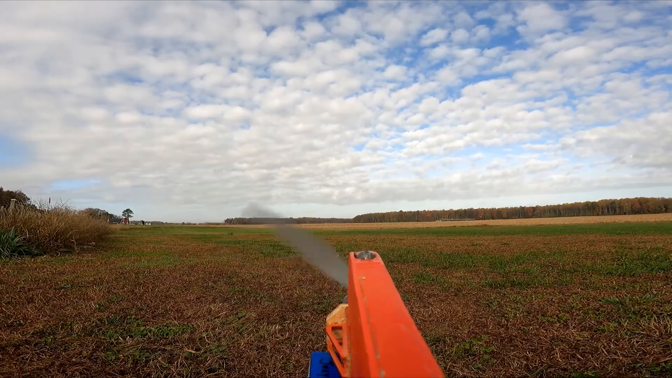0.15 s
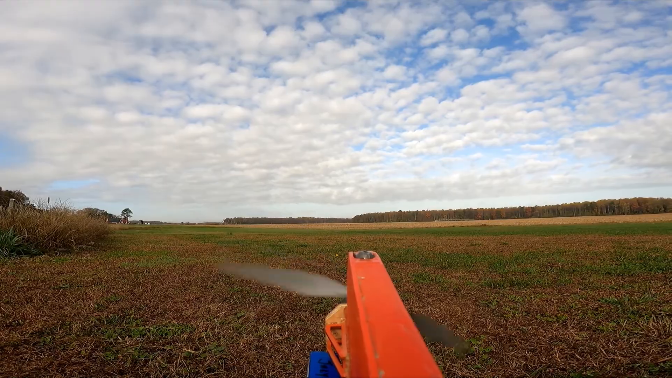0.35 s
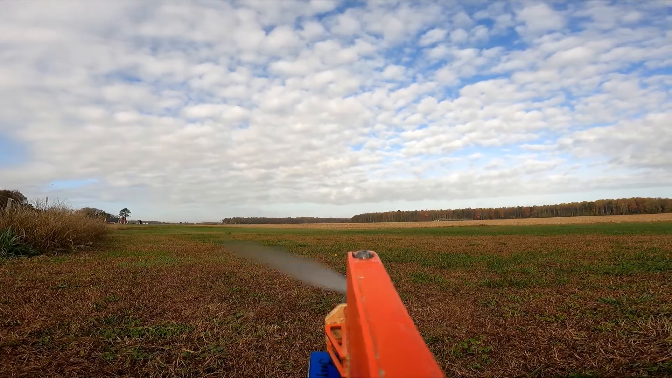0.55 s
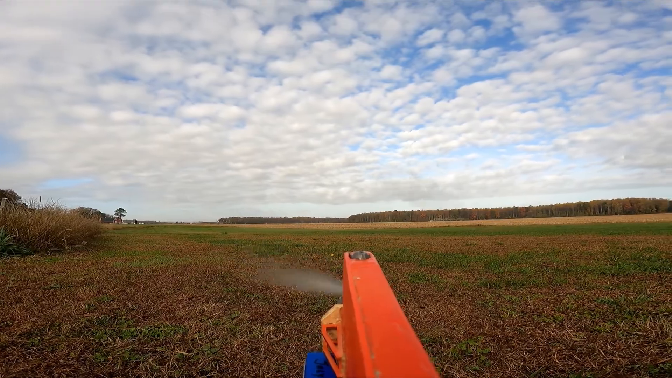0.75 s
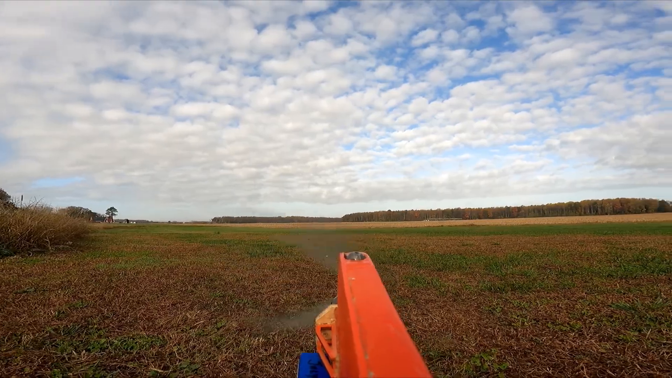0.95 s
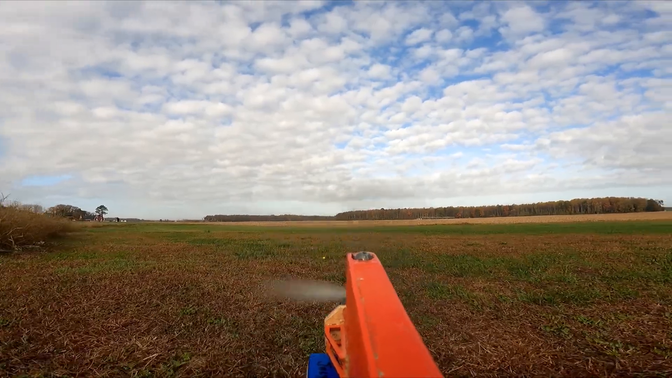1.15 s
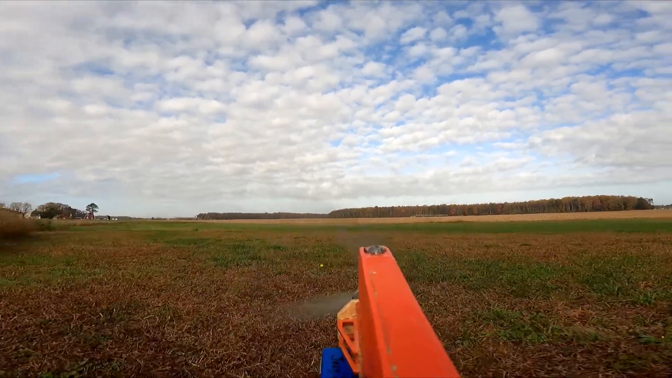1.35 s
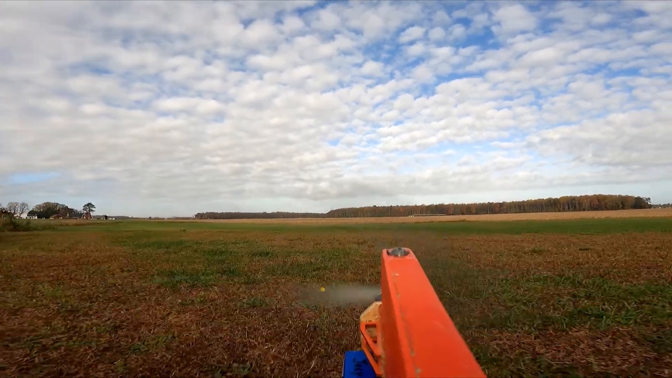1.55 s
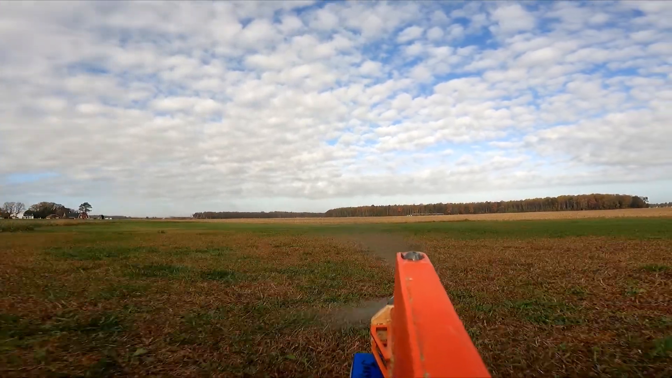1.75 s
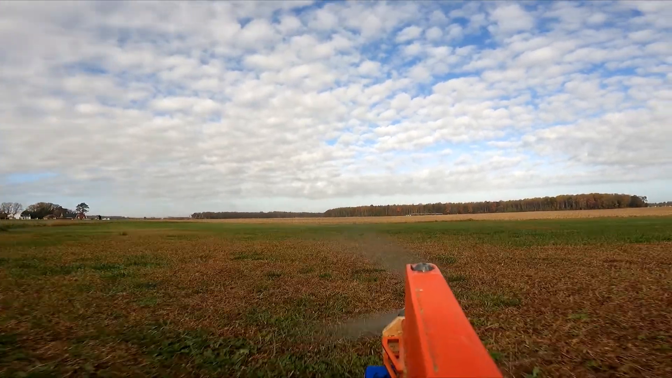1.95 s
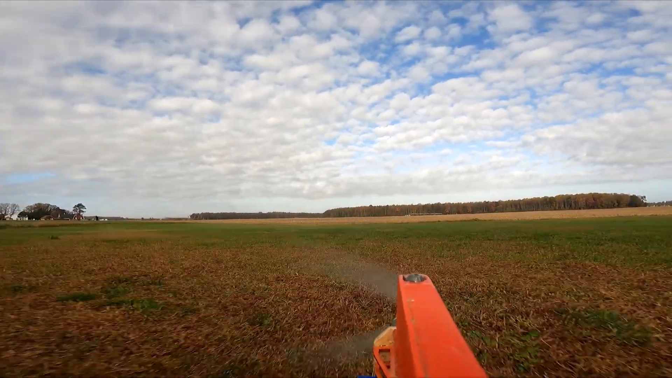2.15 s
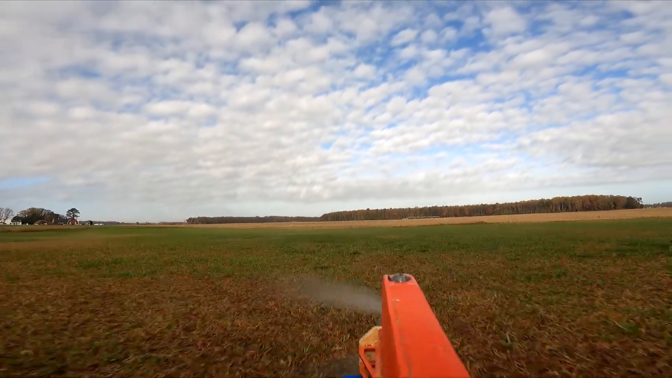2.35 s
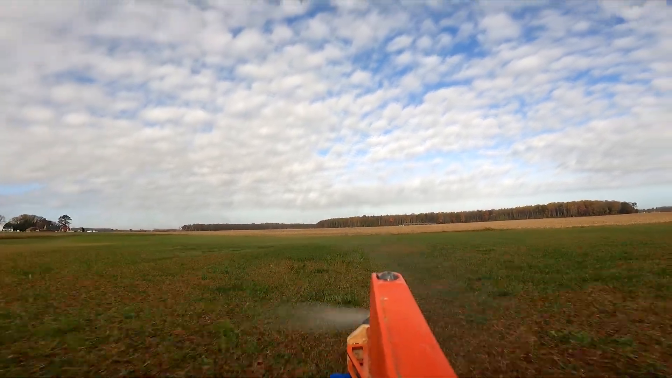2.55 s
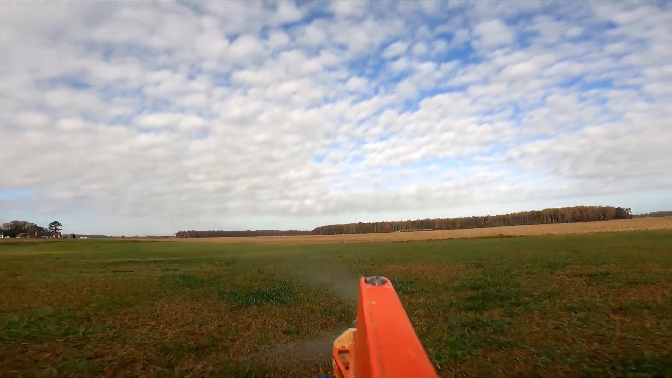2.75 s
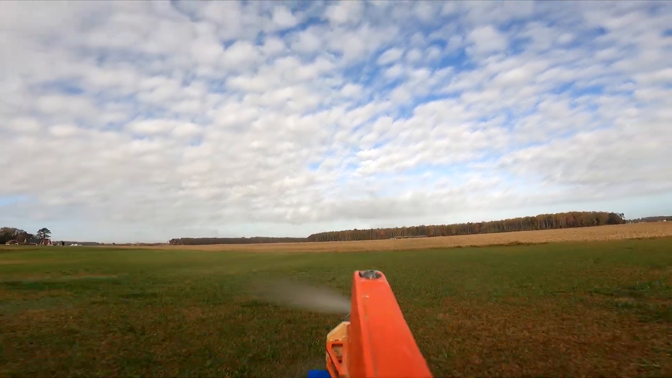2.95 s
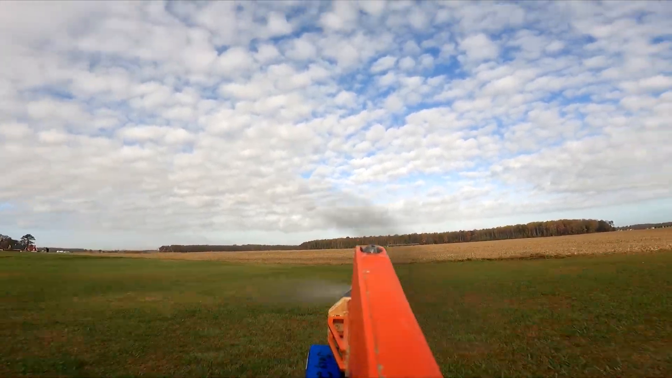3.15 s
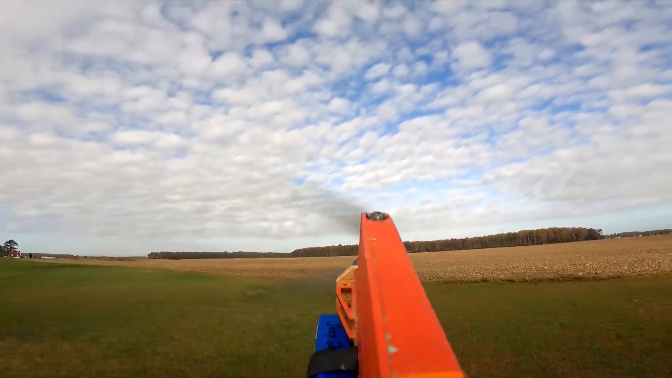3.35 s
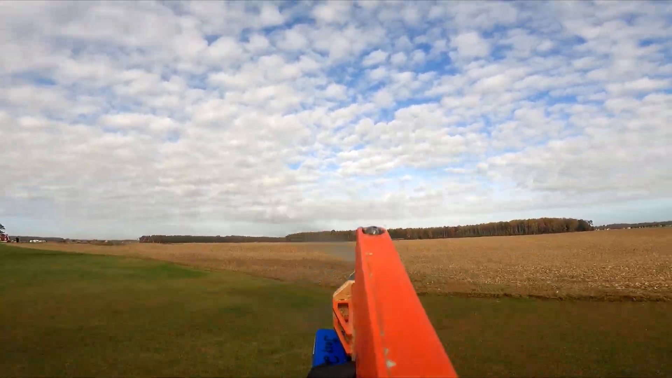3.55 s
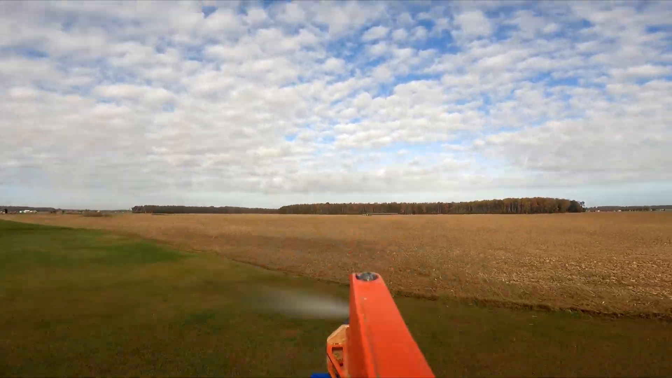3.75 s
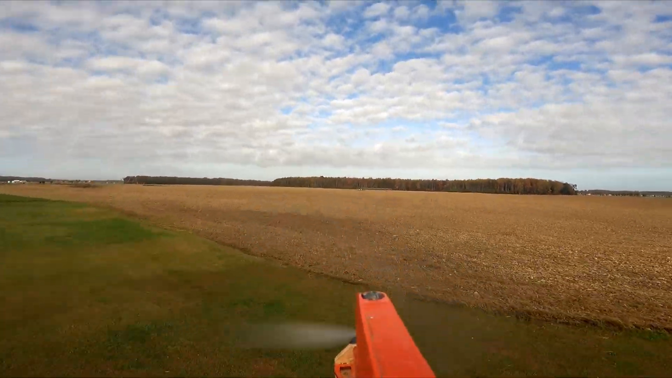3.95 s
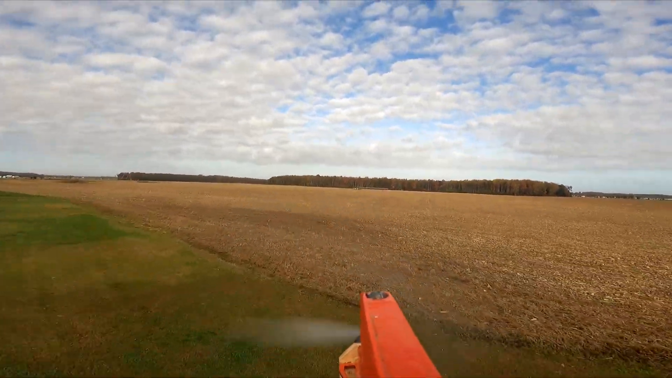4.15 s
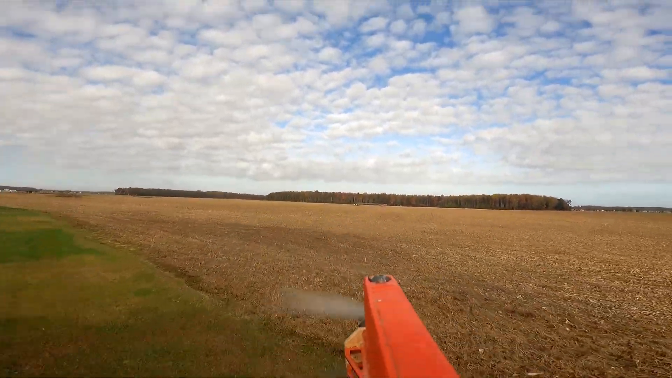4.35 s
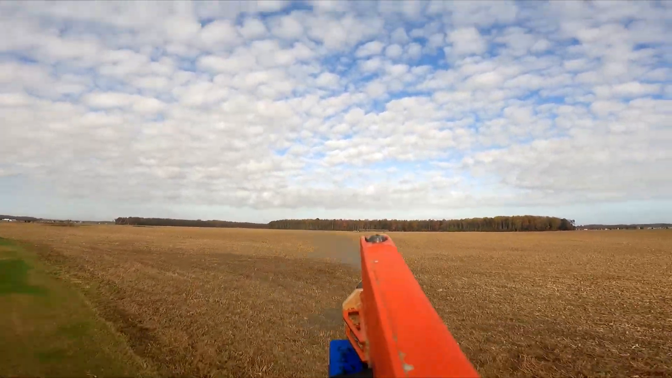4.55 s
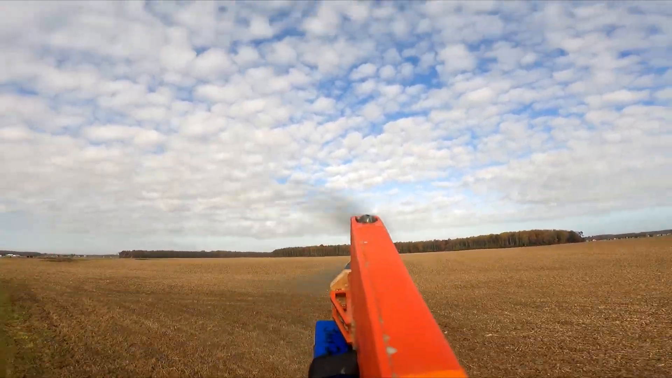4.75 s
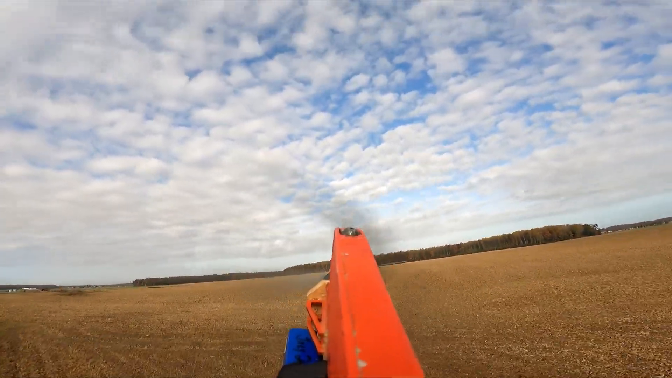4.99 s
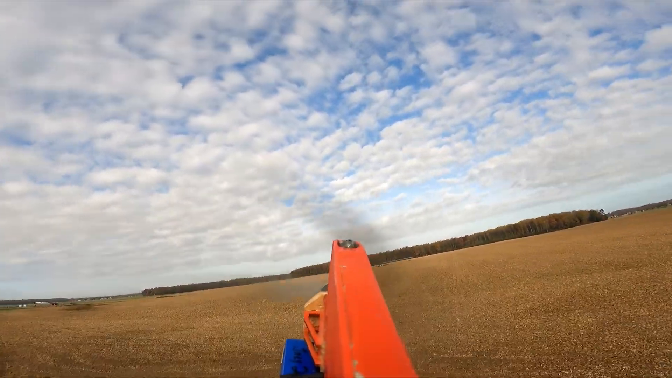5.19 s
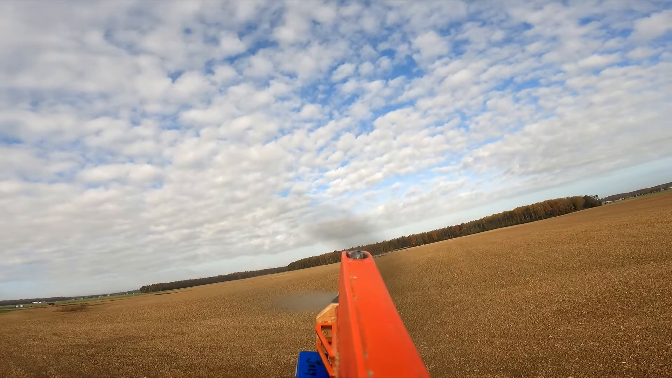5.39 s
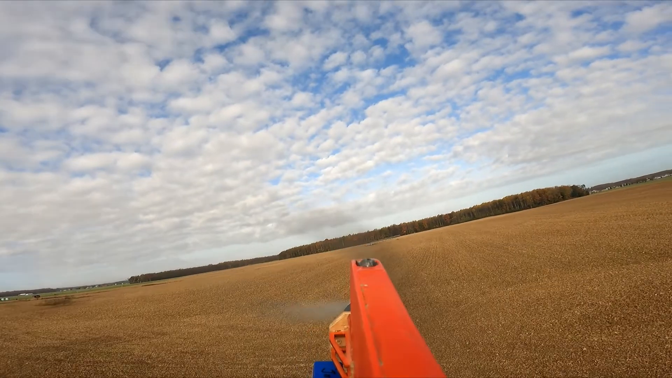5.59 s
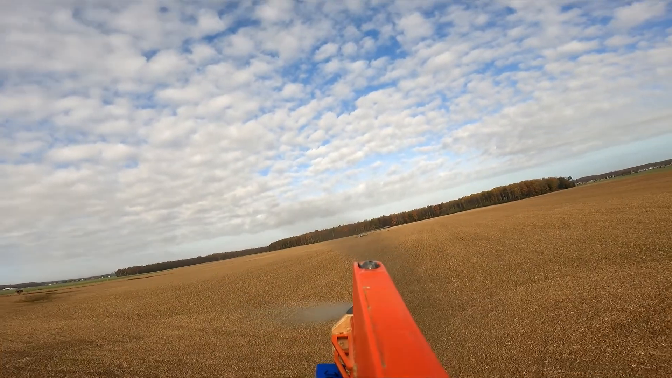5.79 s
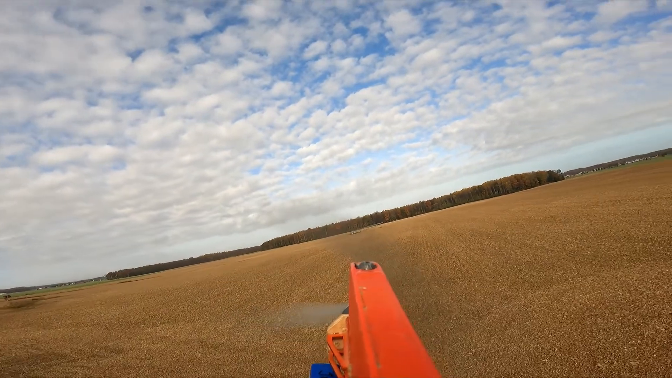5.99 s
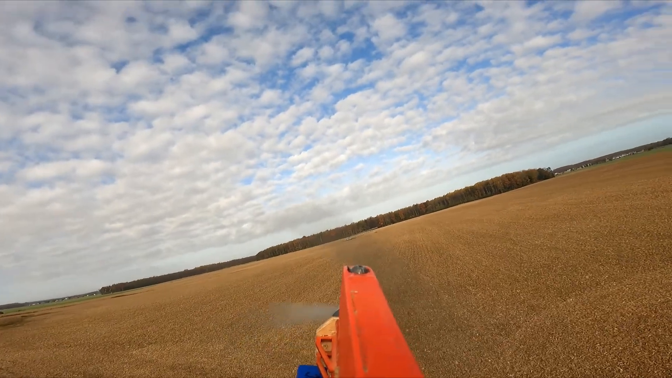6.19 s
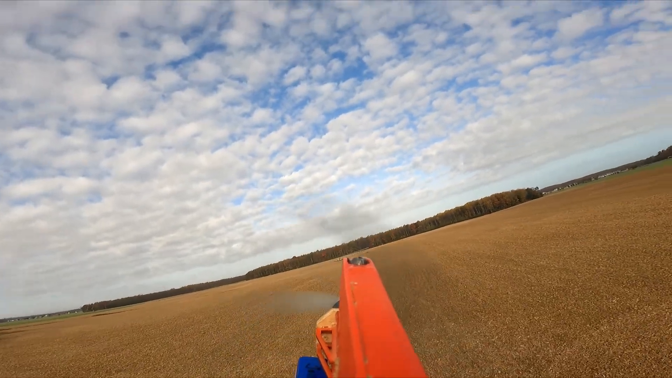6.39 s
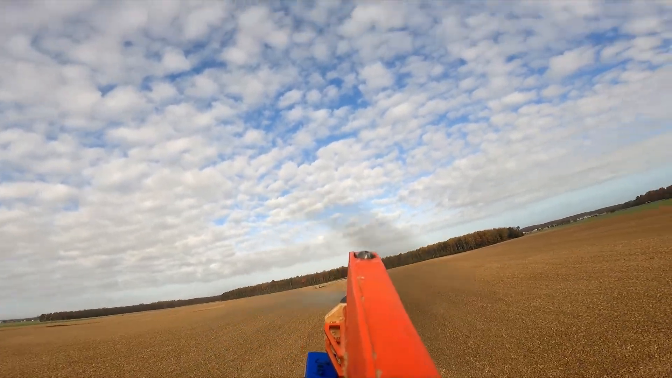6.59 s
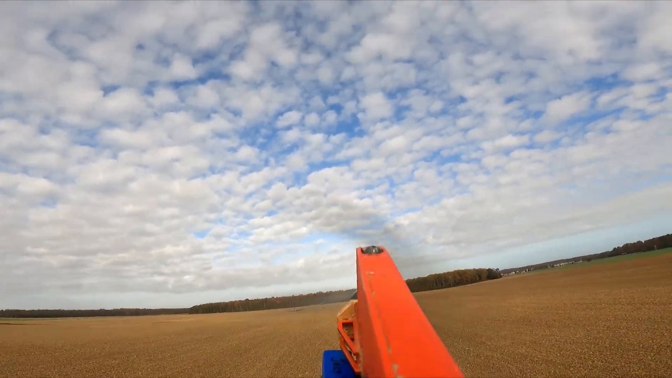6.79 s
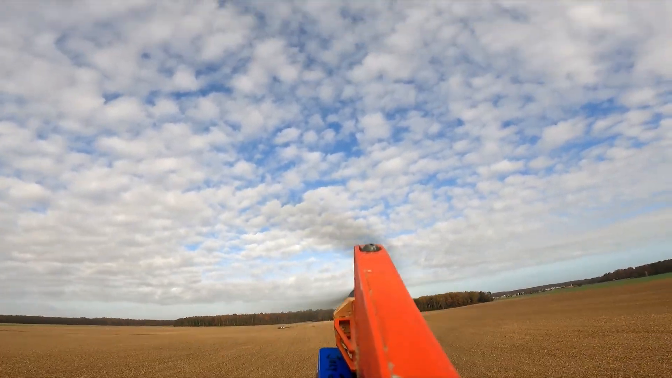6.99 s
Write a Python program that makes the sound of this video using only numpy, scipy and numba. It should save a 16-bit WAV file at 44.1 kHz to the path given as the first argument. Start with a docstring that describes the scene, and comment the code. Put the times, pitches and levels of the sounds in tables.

```python
"""A slowing motor hum with dull rattle and low buffeting, then a punch to full power and a take-off, heard from
the wing root of an electric model plane. Sines locked to the shaft make the unbalance, blade, hum and winding
tones; noise clicks ringing fixed modes make the rattle. Coloured noise makes wind, prop wash, tip hiss and
slaps, and short noise bursts make the knocks of the roll. Early on a little low air spreads between the sides;
then the sound narrows to the centre."""
import sys
import numpy as np
from scipy import signal
from scipy.fft import rfft, irfft, next_fast_len
from scipy.io import wavfile
from scipy.ndimage import uniform_filter1d, minimum_filter1d
from numba import njit

SR = 44100
rng = np.random.default_rng(int(sys.argv[2]) if len(sys.argv) > 2 else 0)


def master(y):
    """Save y as 16-bit WAV."""
    cut = np.clip(np.atleast_2d(y).T, -1, 1)
    pcm = np.round(cut * 32767)  # scale
    wavfile.write(sys.argv[1], SR, pcm.astype(np.int16))


N = 310023

FULL_HZ, LIFT_OFF_S = 135, 2.1  # shaft turns a second at full power; end of the take-off roll
CALM_DB = -43  # gusts are reckoned from this level of the hiss


def undb(db):
    """Gain of a level in dB."""
    return 10 ** (np.asarray(db) / 20)


def unit(x):
    """Scale to rms 1."""
    return x / np.sqrt(np.mean(x ** 2))


def columns(table):
    """Every column of a curve table after the time, interpolated to one value a sample."""
    s, *rest = np.transpose(table)
    return [np.interp(np.arange(N) / SR, s, c) for c in rest]


def gate(start_s, hold_s, attack_s, release_s):
    """Gain that rises from the start, holds until hold_s after it and falls away."""
    end = start_s + max(hold_s, attack_s + 1e-4)
    return np.interp(np.arange(N) / SR, [start_s, start_s + attack_s, end, end + release_s], [0, 1, 1, 0])


def walk(rate):
    """Random levels held 1 / rate s and smoothed twice by a moving average; rms 1."""
    k = int(SR / rate)
    steps = np.repeat(rng.standard_normal(N // k + 1), k)
    return unit(uniform_filter1d(uniform_filter1d(steps, k), k)[:N])


def bandpass(x, order, low_hz, high_hz):
    """Butterworth band-pass."""
    return signal.sosfilt(signal.butter(order, [low_hz, high_hz], "band", fs=SR, output="sos"), x)


def strikes(table, fade_s):
    """Each row of a table of starts and levels sets off an exponential fade."""
    starts = np.zeros(N)
    for s, level_db in table:
        starts[int(s * SR)] = undb(level_db)
    return signal.lfilter([1], [1, -np.exp(-1 / (fade_s * SR))], starts)


def coloured(spectrum, span, gust_db, flicker_db, flicker_rate):
    """Noise of this spectrum, level set within the span; half-octave bands share a gust and flicker alone."""
    hz, db = np.transpose(spectrum)
    bins = np.fft.rfftfreq(next_fast_len(N), 1 / SR) + 1e-9
    shape = undb(np.interp(np.log(bins), np.log(hz), db, -120, -120))
    # rms 1 within the span before the flicker
    inside = (bins > span[0]) & (bins < span[1])
    shape /= np.sqrt(np.sum(shape[inside] ** 2) / len(bins))
    noise = rfft(rng.standard_normal(next_fast_len(N))) * shape
    place, out = 2 * np.log2(bins), 0
    for band in range(int(2 * np.log2(hz[0])), int(2 * np.log2(hz[-1])) + 2):
        share = np.clip(1 - abs(place - band), 0, 1)  # neighbouring bands crossfade
        out = out + irfft(noise * share)[:N] * undb(flicker_db * walk(flicker_rate))
    return out * unit(undb(gust_db + np.zeros(N)))


# Colour of the air that differs between the ports. Each row: pitch in Hz, relative level in dB per Hz.
SIDE_COLOUR = [(15, -32.5), (25, 1), (48, 3), (108, -8.5), (194, -9.5), (733, -20), (2500, -37),
               (6550, -48), (9500, -57.5), (14400, -85.5)]
# Its fading and swelling. Each row: time in seconds, level in dB within 25-105 Hz.
SIDE_AIR = [(0, -31), (.25, -43), (.5, -60), (.65, -87), (.8, -43), (1, -70), (2, -96)]


def side_air():
    """Air turbulence that differs between the two ports, as low flickering noise."""
    return coloured(SIDE_COLOUR, (25, 105), 0, 1, 20) * undb(columns(SIDE_AIR)[0])


BLAST_S, BLAST_RISE_S, BLAST_FALL_S, BLAST_DB = 0.753, 0.068, 0.62, 5.5  # BLAST_DB is extra rush


def blast():
    """The first blast of prop wash swells fast and dies away slowly."""
    return gate(BLAST_S, BLAST_RISE_S, BLAST_RISE_S, BLAST_FALL_S)


# Colours of the slow buffet, the rush of prop wash, the wind hiss and the blade-tip hiss.
# Each row: pitch in Hz, relative level in dB per Hz.
BUFFET = [(12, -42.5), (20, -7), (110, 2), (140, -3), (200, -11.5), (330, -20), (500, -25.5), (800, -58)]
RUSH = [(150, 7.5), (300, 6), (450, 0), (650, -5.5), (900, -13.5), (1300, -58), (2000, -52.5)]
HISS = [(600, -28.5), (900, -0.5), (1400, -7.5), (1900, -11), (2600, -15), (3600, -19), (5000, -27.5),
        (7000, -60.5), (10000, -45), (13000, -65.5)]
TIP_HISS = [(2500, -20.5), (3800, -7), (4600, -3), (5200, -0.5), (5700, -5), (6100, -9.5), (7500, -13.5),
            (8500, -14.5), (9500, -14.5), (10800, -22.5), (12500, -28), (14500, -51)]
# Slow eddies. Each row: time in seconds, buffet in dB within 25-105 Hz before gusts and sway.
EDDIES = [(0, -25), (.45, -29.5), (.62, -37), (.7, -28), (.76, -19.5), (.9, -16.5), (1.5, -23), (2.1, -25),
          (2.9, -25), (3.7, -27), (5.8, -25.5), (6.25, -25), (6.7, -26.5), (7.03, -29)]
# Blade tips shearing the air. Each row: time in seconds, level in dB within 4600-6000 Hz.
TIPS = [(0, -56.5), (.55, -67), (.62, -51), (.76, -48.5), (.98, -53.5), (1.05, -62), (1.11, -57.5),
        (1.6, -56), (2, -56), (3, -60), (3.6, -60.5), (3.75, -55), (4, -56), (4.42, -53), (4.55, -58),
        (4.9, -58.5), (5.1, -55), (6.1, -54), (6.25, -52), (6.35, -58), (7.03, -56.5)]
# Bands in Hz in which the levels hold
RUSH_SPAN, HISS_SPAN, TIP_SPAN = (620, 850), (1200, 2400), (4600, 6000)
EDDY_SWAY_DB, CALM_EDDY_DB = 2, -27
# Wash at full speed in calm air, and the power of speed it grows with
RUSH_DB, RUSH_POWER = -35.5, 1
# dB moved per dB of gust or eddy
GUST_ON_RUSH, GUST_ON_BUFFET, EDDY_ON_RUSH = 0.35, 0.068, 0.27


def air(hz, gust_db):
    """Slow eddies thump, smaller ones rush, and the hiss comes in short bursts as eddies break on the port."""
    speed_db = 20 * np.log10(hz / FULL_HZ)
    eddy_db = columns(EDDIES)[0]
    buffet_db = eddy_db + GUST_ON_BUFFET * gust_db + EDDY_SWAY_DB * walk(6)
    rush_db = RUSH_DB + RUSH_POWER * speed_db + GUST_ON_RUSH * gust_db
    rush_db = rush_db + EDDY_ON_RUSH * (eddy_db - CALM_EDDY_DB) + BLAST_DB * blast()
    gust = walk(22)
    bursts = 0.4 * gust + 2.64 * np.clip(walk(170), 0, 2) ** 1.11
    buffet = undb(buffet_db) * coloured(BUFFET, (25, 105), 0, .6, 12)
    rush = undb(rush_db) * coloured(RUSH, RUSH_SPAN, 0.66 * gust + 0.53 * bursts, 0.094, 34)
    hiss = undb(CALM_DB + gust_db) * coloured(HISS, HISS_SPAN, bursts, 1.0, 30)
    tips = undb(columns(TIPS)[0]) * coloured(TIP_HISS, TIP_SPAN, 0.79 * bursts, 2.1, 18)
    return buffet + rush + hiss + tips


# Eddies that slap the port. Each row: start in seconds, strength in dB before smoothing and scaling.
SLAPS = [(0.736, -20), (0.748, -17), (0.757, -16), (0.811, -23), (0.947, -22.5), (0.983, -16),
         (2.7337, -21), (2.78, -33), (2.805, -25.5), (2.828, -27), (2.849, -23), (2.882, -26), (3.177, -24),
         (3.6236, -23.5), (4.679, -25.5), (5.0531, -29), (5.134, -32), (5.209, -28), (5.4398, -23),
         (5.9195, -27), (6.2083, -23.5), (6.238, -24), (6.268, -34), (6.46, -27), (6.573, -25), (6.67, -28),
         (6.864, -27)]
SLAP_TOP_DB = -20  # bright edge, relative to the hiss of the slap


def slaps():
    """Each slap is a few milliseconds of hiss that swells quickly and dies away."""
    fade = strikes(SLAPS, 0.0065)
    fade = uniform_filter1d(uniform_filter1d(fade, size=90), size=90)  # the push builds over a few ms
    hiss = coloured(HISS, HISS_SPAN, 0, 0, 30)
    edge = undb(SLAP_TOP_DB) * coloured(TIP_HISS, TIP_SPAN, 0, 0, 30)
    # the peak of a noise burst stands well over its rms
    return 0.36 * fade * (hiss + edge)


# Wheels knocking over stubble on the take-off roll.
# Each row: start in seconds, strength in dB before smoothing and halving.
KNOCKS = [(.873, -33), (.904, -32), (0.934, -23), (1.014, -24), (1.059, -22), (1.098, -33), (1.122, -31),
          (1.15, -22), (1.181, -30), (1.271, -28), (1.341, -34), (1.353, -23), (1.366, -37), (1.431, -27),
          (1.538, -28)]
KNOCK_S, KNOCK_LOW_HZ, KNOCK_HIGH_HZ = 0.0023, 1000, 3500
# Something loose ticks once a turn early in the roll
TICK_S, TICK_LASTS_S, TICK_DB, TICK_LOW_HZ, TICK_HIGH_HZ = 1.12, .2, -51, 2800, 4900


def knocks(turns):
    """Short dry knocks through the undercarriage, and a tick once a turn that shows as a comb of tones."""
    fade = uniform_filter1d(strikes(KNOCKS, KNOCK_S), size=40)
    ticks = np.diff(np.floor(turns / (2 * np.pi)), prepend=0) * undb(2 * walk(40))
    scrape = rng.standard_normal(260) * np.hanning(260)  # each tick is a brief scrape
    ticks = signal.fftconvolve(ticks, scrape)[:N]
    ticks = unit(bandpass(ticks, 3, TICK_LOW_HZ, TICK_HIGH_HZ))
    knock = unit(bandpass(rng.standard_normal(N), 3, KNOCK_LOW_HZ, KNOCK_HIGH_HZ))
    return fade * knock / 2 + undb(TICK_DB) * gate(TICK_S, TICK_LASTS_S, 0.033, .1) * ticks


@njit
def svf(x, hz, width):
    """State-variable band-pass, gain 1 at the centre."""
    y, b, l = np.empty(len(x)), 0., 0.
    g, k = np.tan(np.pi * hz / SR), width / hz
    for i in range(len(x)):
        v = (b + g * (x[i] - l)) / (1 + g * (g + k))
        b, l, y[i] = 2 * v - b, l + 2 * g * v, k * v
    return y


# Motor mount and fuselage modes. Each row: pitch in Hz, nominal width in Hz, level in dB.
MOUNT = [(570, 90, -1), (1050, 170, -4), (1620, 200, -10), (2200, 400, -13), (2700, 520, -7),
         (3270, 260, -8), (3800, 420, -19)]


def mount(x):
    """The motor mount and fuselage ring at fixed modes, with steep skirts from two filters in a row."""
    out = 0
    for hz, width, db in MOUNT:
        wide = 1.55 * width  # two filters in a row narrow the peak
        out = out + undb(db) * svf(svf(x, 1. * hz, wide), 1. * hz, wide)
    return out


# Throttle pushes, which drive rattle and motor alike. Each row: start in seconds, strain length in seconds,
# whine drive in dB, rattle drive in dB, whistle length in seconds, whistle level in dB.
THROTTLE = [(.61, .195, -23.5, -30.5, .17, -60), (1.5, .16, -55, -60, .17, -66)]
RATTLE_ATTACK_S, RATTLE_RELEASE_S = .04, .28
COAST_RATTLE_DB, COAST_RATTLE_HZ, FLIGHT_RATTLE_DB = -35, 450, -55.5
SKIN_DB, SKIN_TOP_HZ = -8.5, 3400  # the foam skin passes a broad rasp up to here
# The top of the clicks reaches the port directly as the push peaks; level relative to the rattle drive
CRACKLE_DB, CRACKLE_LOW_HZ, CRACKLE_HIGH_HZ, CRACKLE_RISE_S, CRACKLE_FALL_S = -24, 5000, 10000, 0.14, .25


def airframe(x):
    """Mount modes plus the skin's broad rasp, fed backwards in time so the two stay unrelated."""
    return unit(mount(x) + undb(SKIN_DB) * bandpass(x[::-1], 8, 500, SKIN_TOP_HZ))


def rattle():
    """Loose parts chatter in dense uneven clicks that ring mount and skin: dull in the coast, sharp at a push."""
    shake, crackle = undb(FLIGHT_RATTLE_DB), 0
    for s, strain_s, _, rattle_db, *_ in THROTTLE:
        shake = shake + undb(rattle_db) * gate(s, strain_s, RATTLE_ATTACK_S, RATTLE_RELEASE_S) ** 2
        crackle = crackle + undb(rattle_db + CRACKLE_DB) * gate(s, 0, CRACKLE_RISE_S, CRACKLE_FALL_S)
    clicks = rng.standard_normal(N) * undb(2.2 * rng.exponential(size=N))
    even = airframe(clicks)
    clicks = clicks * undb(3 * walk(120))  # the chatter comes in uneven clumps
    sharp = airframe(clicks)
    dull = unit(signal.lfilter(*signal.butter(1, COAST_RATTLE_HZ, fs=SR), even))
    bright = unit(bandpass(clicks, 2, CRACKLE_LOW_HZ, CRACKLE_HIGH_HZ))
    coasting = gate(-1, 1 + THROTTLE[0][0], .1, .3)  # until the first push
    return sharp * shake + bright * crackle + dull * undb(COAST_RATTLE_DB) * coasting


# How loudly the airframe sounds the rotor hum. Each row: pitch in Hz, level in dB.
HUM = [(300, -30), (315, -28.5), (340, -32), (390, -31), (430, -24), (500, -21), (560, -18.5), (690, -24),
       (790, -30), (900, -26), (1130, -28), (1230, -50), (1600, -50.5), (1750, -56)]
HUM_ORDER, WINDING_ORDER = 13, 42  # cycles a turn
HUM_THROB, HUM_HALO_DB = .3, -13  # depth of the swell once a turn; noise around the hum
SWITCH_HZ, WHISTLE_EDGE_S, WHISTLE_LEAD_S = 8010, .02, .02
PUSH_ATTACK_S, PUSH_RELEASE_S = .03, .03
ROLL_WHINE_FROM_S, ROLL_WHINE_DB, CRUISE_WHINE_DB = 1.09, -56, -69  # drives into the whine
WHINE_HALO_DB, WHINE_HALO_HZ, WHINE_THROB = 4, 1100, .6  # halo and throb at full speed
STRAND_DB = -12  # side strand, one hum order under the whine


def rotor_hum(turns, waver, hz):
    """The rotor's wavering tone and faint octave, as loud as the airframe sounds each pitch."""
    pitch_hz, level_db = np.transpose(HUM)
    hum_db = np.interp(np.log(HUM_ORDER * hz), np.log(pitch_hz), level_db)
    hum = (np.sin(waver) + undb(-25) * np.sin(2 * waver)) * undb(1.2 * walk(70))
    hum = hum * (1 + HUM_THROB * np.cos(turns))
    hum = hum + undb(HUM_HALO_DB) * (walk(250) * np.sin(waver) + walk(250) * np.cos(waver))
    return undb(hum_db) * hum


def winding_whine(turns, waver, hz):
    """Three harmonics of the windings with noisy halos, heard through the mount and partly direct."""
    speed, whine = hz / FULL_HZ, 0
    for k in (1, 2, 3):
        pitch_hz = k * WINDING_ORDER * hz
        # low tones radiate poorly and overtones die out above the mount's range
        reach = 1 / (1 + (1500 / pitch_hz) ** 7) / (1 + (k > 1) * (pitch_hz / 3500) ** 14)
        core = np.exp(.6j * walk(150)) * undb(1.5 * walk(80))
        halo = (walk(WHINE_HALO_HZ) + 1j * walk(WHINE_HALO_HZ)) / np.sqrt(2)
        halo = undb(WHINE_HALO_DB) * speed ** 2 * halo
        tone = np.exp(1j * k * WINDING_ORDER * turns) * (core + halo)
        whine = whine + reach * undb(-1.0 * (k - 1.0)) * tone
    whine = whine * (1 + WHINE_THROB * speed ** 2 * np.cos(turns))
    strand = undb(STRAND_DB) * whine * np.exp(-1j * waver)
    return undb(-3) * mount((whine + strand).real) + undb(-10) * whine.imag


def motor(turns, hz):
    """Rotor hum, winding whine that strains at each push, and the controller's steady whistle at the pushes."""
    roll = gate(ROLL_WHINE_FROM_S, LIFT_OFF_S - ROLL_WHINE_FROM_S, 0.04, .2)
    strain, switch = undb(CRUISE_WHINE_DB) + undb(ROLL_WHINE_DB) * roll, 0
    for s, strain_s, whine_db, _, whistle_s, whistle_db in THROTTLE:
        strain = strain + undb(whine_db) * gate(s, strain_s, PUSH_ATTACK_S, PUSH_RELEASE_S)
        edges = gate(s - WHISTLE_LEAD_S, whistle_s, WHISTLE_EDGE_S, WHISTLE_EDGE_S)
        switch = switch + undb(whistle_db) * edges
    waver = HUM_ORDER * turns + .45 * walk(90)
    hum = rotor_hum(turns, waver, hz)
    whine = strain * winding_whine(turns, waver, hz)
    whistle = switch * np.sin(2 * np.pi * SWITCH_HZ * np.arange(N) / SR)
    return np.sqrt(2) * (hum + whine + whistle)  # levels are rms


# Propeller in calm air. Each row: time in seconds, unbalance tone in dB, blade tone in dB,
# flutter side tones in dB.
PROP = [(0, -26, -49, -71), (.75, -33, -38, -69), (.9, -27, -44, -41), (1.2, -19, -39, -42),
        (1.45, -12, -47, -48), (1.9, -13.5, -23.5, -31.5), (2.05, -22, -27.5, -23.5), (2.2, -14, -28, -23),
        (2.4, -15.5, -22, -27.5), (2.65, -25, -17, -23.5), (2.8, -25.5, -23.5, -18.5),
        (3.05, -22.5, -15, -21.5), (3.35, -29, -14, -20), (3.55, -30.5, -16.5, -14),
        (3.9, -29.5, -15, -23.5), (4.9, -25.5, -13.5, -25.5), (5.6, -31, -12.5, -23.5),
        (6.3, -32, -15, -25), (6.75, -22.5, -13, -20), (7.03, -26.5, -12.5, -41)]
BLADES = 2
GUST_ON_UNBALANCE, GUST_ON_BLADE = 0.34, -0.47  # dB per dB of gust


def propeller(turns, gust_db):
    """Unbalance shakes once a turn, the blades twice; a fluttering wing scatters the blade tone to side tones."""
    once_db, blade_db, flutter_db = columns(PROP)
    once_db = once_db + GUST_ON_UNBALANCE * gust_db
    blade_db = blade_db + GUST_ON_BLADE * gust_db
    swing = np.cumsum(42 + 4 * walk(6)) * 2 * np.pi / SR  # flutter phase, around 42 Hz
    # the upper side tone leads; a sway fills the space next to the blade tone
    upper = .5 * np.exp(1j * swing) * (walk(40) + 1j * walk(40))
    lower = .35 * np.exp(-1j * swing) * (walk(28) + 1j * walk(28))
    sway = .45 * (walk(45) + 1j * walk(45))
    steady = np.exp(.35j * walk(8.4)) * undb(0.61 * walk(18))
    flutter = undb(flutter_db) * (upper + lower + sway)
    blade = np.exp(1j * BLADES * turns) * (undb(blade_db) * steady + flutter)
    # the overtone fades with the blade tone once that falls under -22 dB
    overtone = undb(-37.5) * np.sin(2 * BLADES * turns + .5 * walk(19)) * np.clip(undb(blade_db + 22.0), 0, 1)
    unsettled = 1.3 * blast()  # the blast roughens the shake
    once = np.sin(turns + 0.6 * walk(15) + unsettled * walk(49.97)) * undb(0.45 * walk(20))
    return np.sqrt(2) * (undb(once_db) * once + blade.real + overtone)


# Motor speed. Each row: time in seconds, shaft turns in Hz.
SHAFT = [(0, 38.93), (.3, 29.44), (.52, 23.74), (.61, 24.24), (.643, 26.24), (.651, 32.26), (.68, 39.54),
         (.72, 53.2), (.76, 70.1), (.8, 86.15), (.83, 95), (.9, 105.4), (1.1, 118.2), (1.3, 121.8),
         (1.6, 125.3), (1.7, 134.6), (2.3, 135.2), (3.2, 134.1), (4.4, 135.1), (5.5, 134.5), (7.03, 136)]
# Gusts on the microphone. Each row: time in seconds, hiss in dB within 1200-2400 Hz.
GUSTS = [(0, -48), (.5, -56), (.74, -39.5), (1, -39.5), (1.1, -43), (1.4, -46.5), (1.63, -47), (1.7, -46),
         (2.0, -47), (2.2, -46), (2.48, -41.5), (2.57, -41), (2.66, -44), (2.79, -42), (2.85, -39),
         (2.94, -41.5), (3.3, -42), (3.58, -43.5), (3.74, -46), (3.95, -52.5), (4.15, -48), (4.3, -43),
         (4.43, -41), (4.52, -43), (4.88, -41.5), (5.08, -38), (5.4, -42), (5.75, -44.5), (6.13, -41),
         (6.24, -38.5), (6.31, -40), (6.55, -36.5), (6.75, -43), (6.92, -39.5), (7.03, -45.5)]


def scene():
    """Everything reaches both ports alike; only the air differs a little between them."""
    hz, gust_db = columns(SHAFT)[0], columns(GUSTS)[0] - CALM_DB
    turns = 2 * np.pi * np.cumsum(hz) / SR  # shaft angle in radians
    mid = air(hz, gust_db) + slaps() + knocks(turns)
    mid = mid + rattle() + motor(turns, hz) + propeller(turns, gust_db)
    side = side_air()
    return np.array([mid + side, mid - side])


LIMIT, LIMIT_S = .73, .006  # peak level before the rounding; smoothing of the gain
TOP_HZ = 14900


def record(dry):
    """The camera limits and rounds the loudest peaks, its housing dulls the highs, and the top is cut."""
    span = int(LIMIT_S * SR)
    room = np.clip(LIMIT / (abs(dry).max(axis=0) + 1e-9), 0, 1)
    room = minimum_filter1d(room, size=2 * span)  # the gain ducks ahead of each peak
    held = dry * uniform_filter1d(room, size=span)
    rounded = 1.2 * np.tanh(held / 1.2)
    housed = signal.sosfilt(signal.butter(4, 13000, fs=SR, output="sos"), rounded)
    return signal.sosfilt(signal.ellip(8, .2, 70, TOP_HZ, fs=SR, output="sos"), housed)


dry = scene()
out = record(dry)
master(out)
```